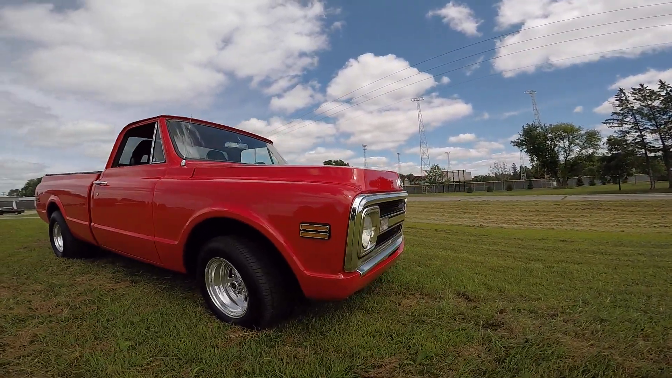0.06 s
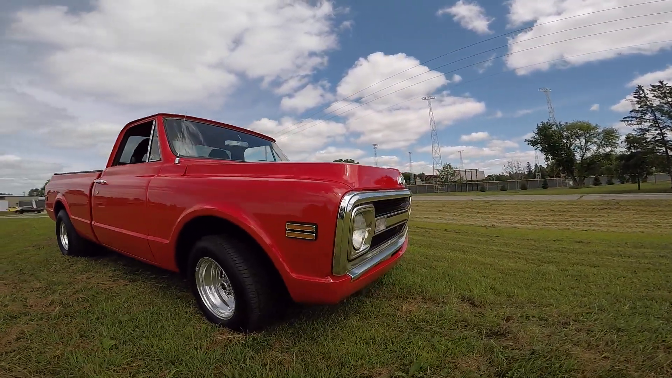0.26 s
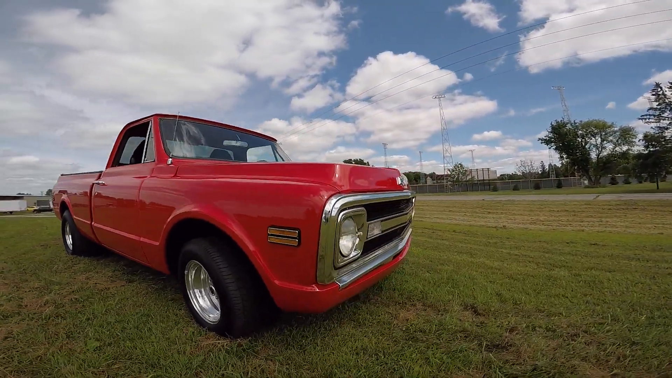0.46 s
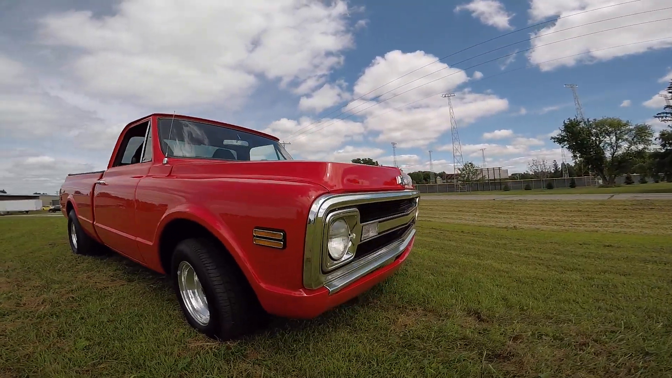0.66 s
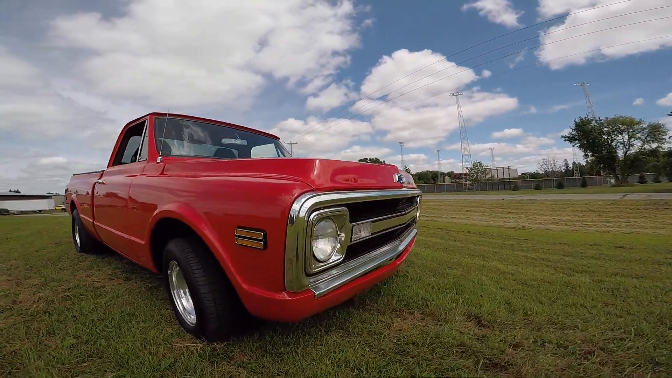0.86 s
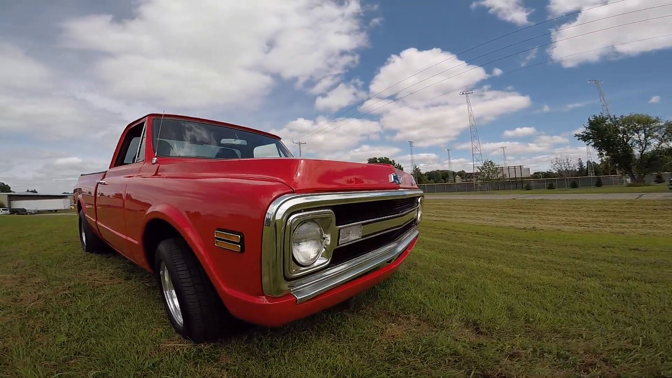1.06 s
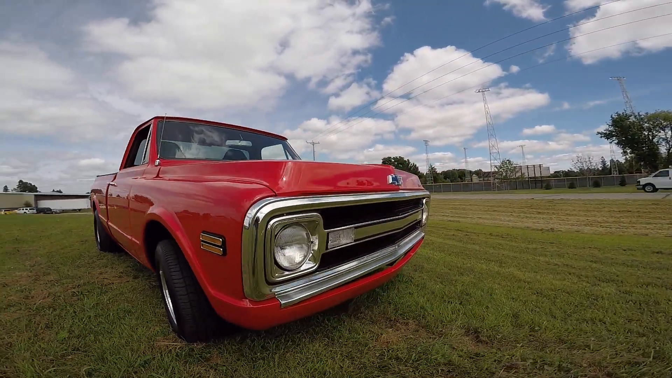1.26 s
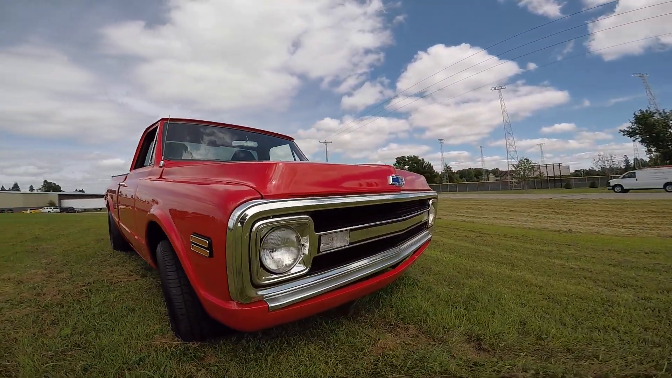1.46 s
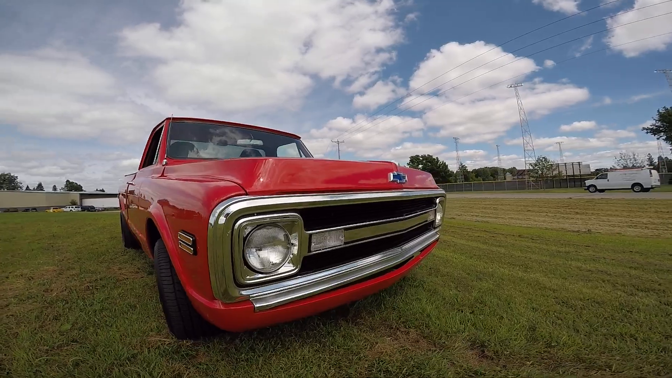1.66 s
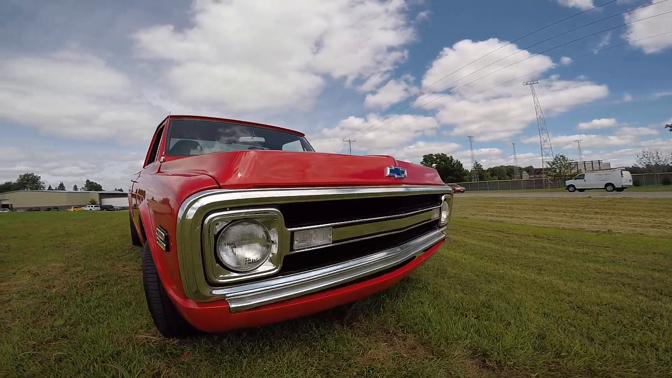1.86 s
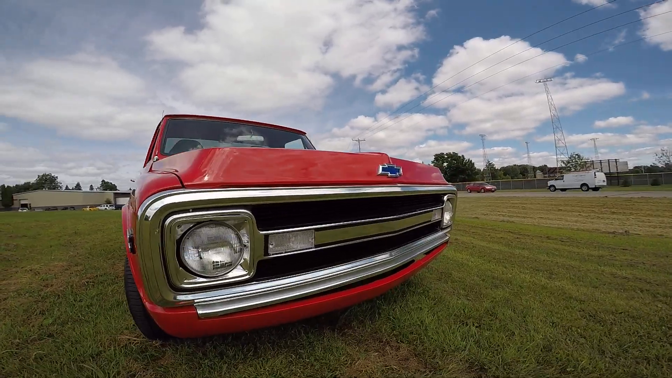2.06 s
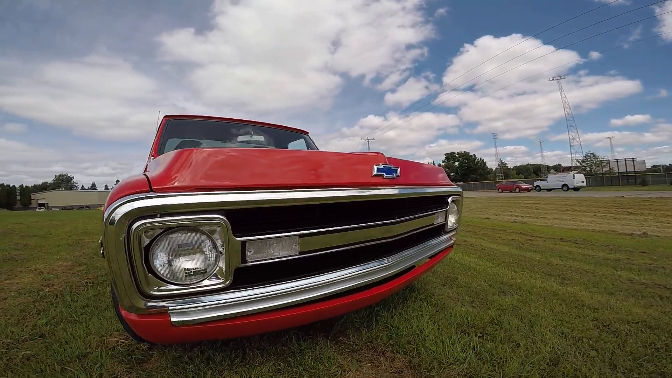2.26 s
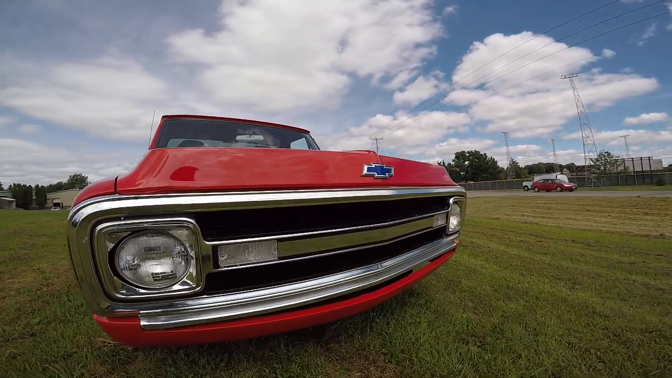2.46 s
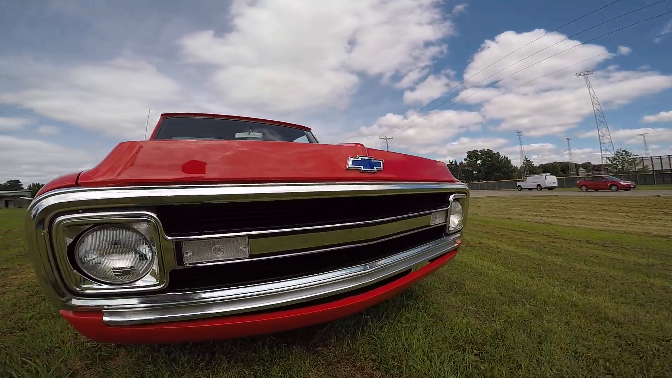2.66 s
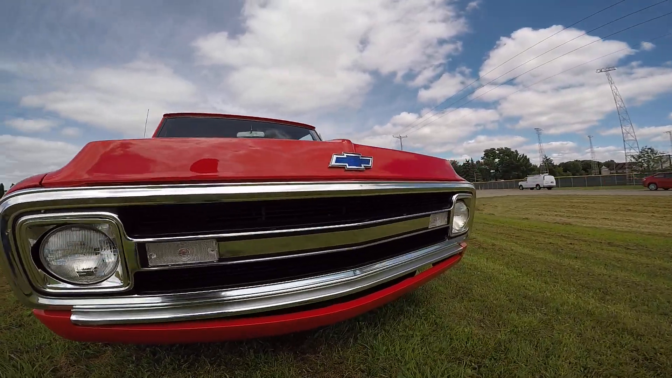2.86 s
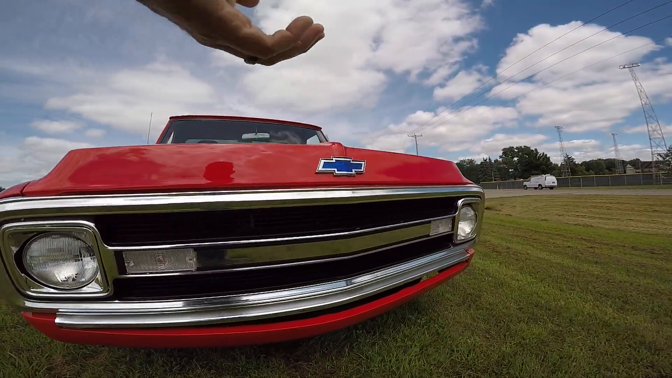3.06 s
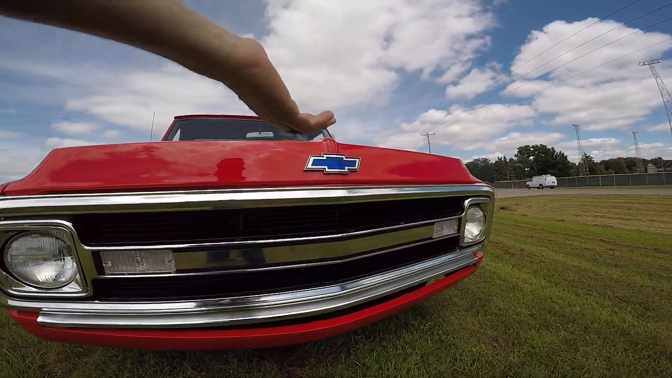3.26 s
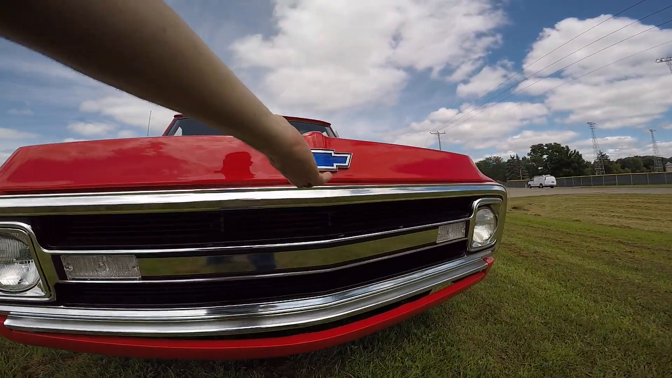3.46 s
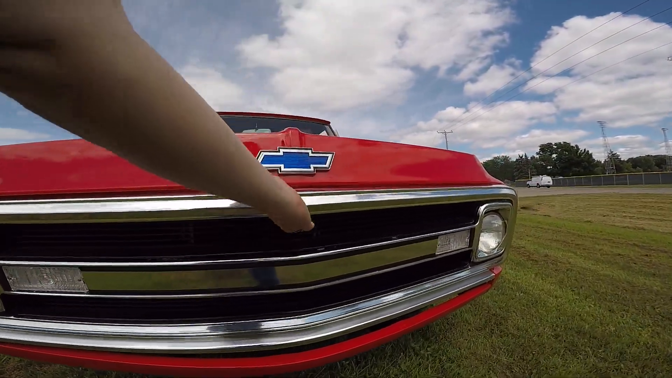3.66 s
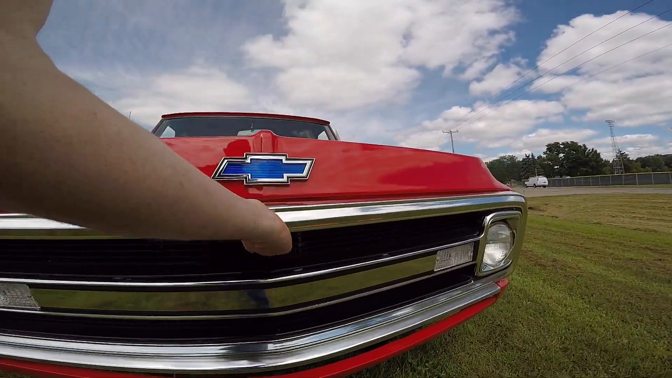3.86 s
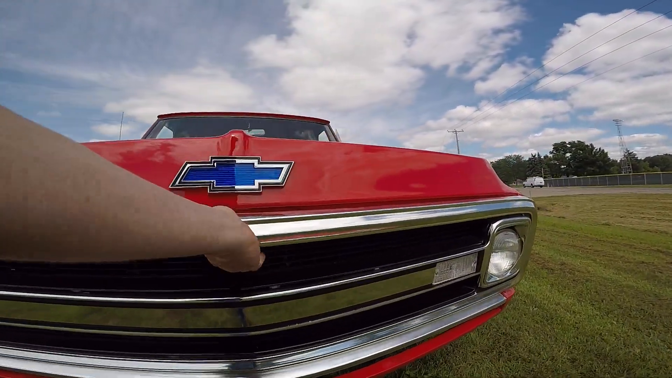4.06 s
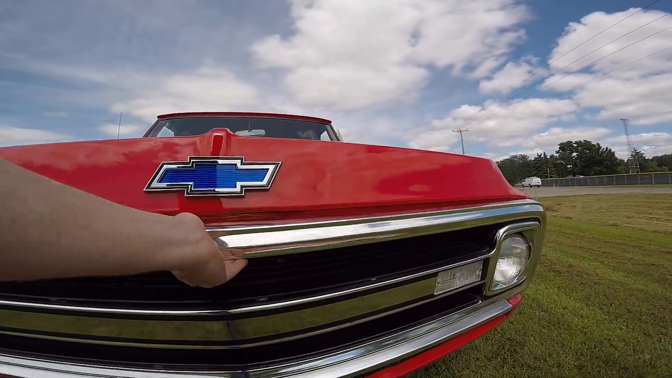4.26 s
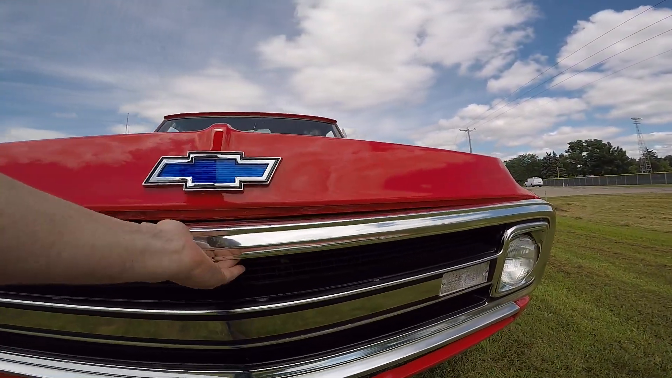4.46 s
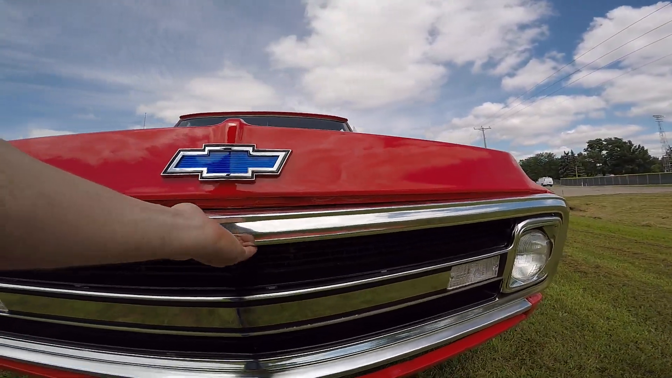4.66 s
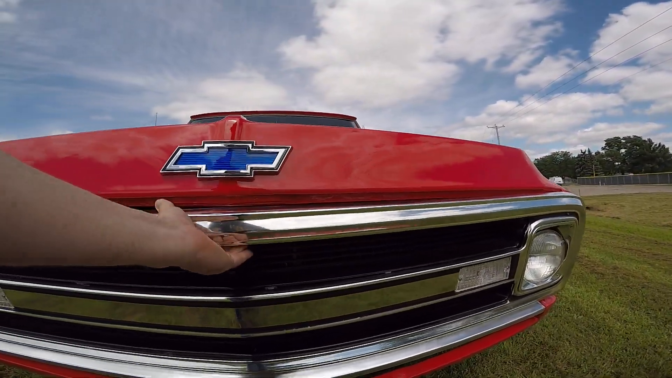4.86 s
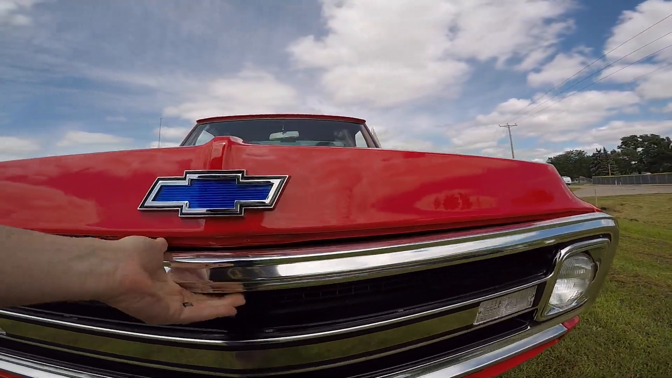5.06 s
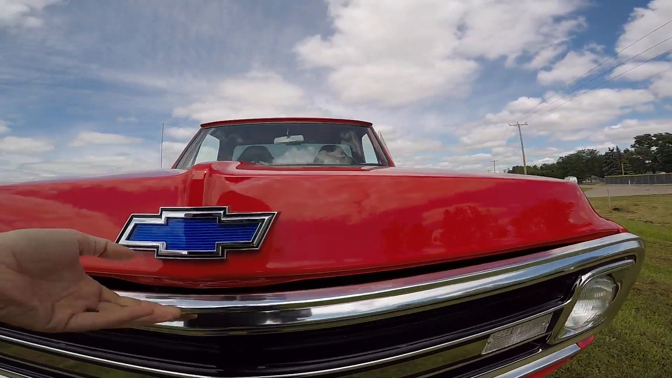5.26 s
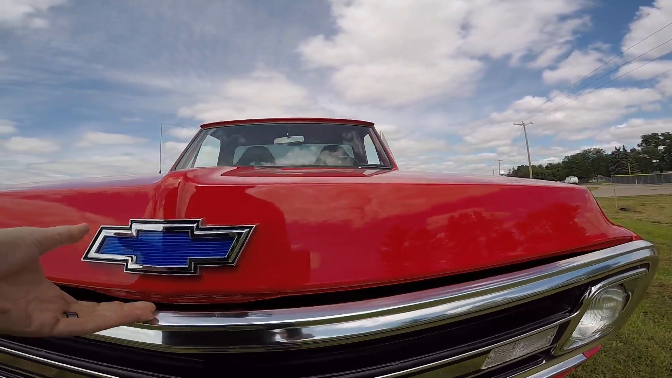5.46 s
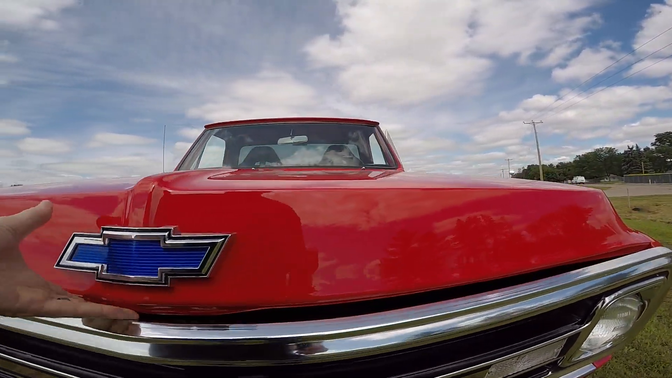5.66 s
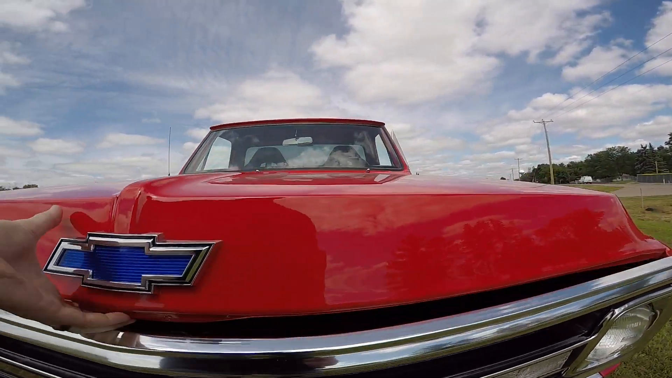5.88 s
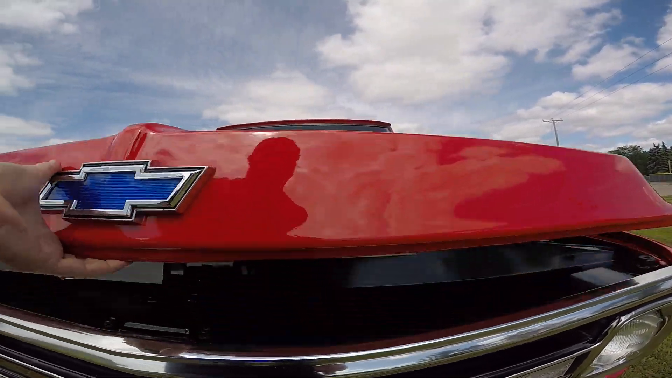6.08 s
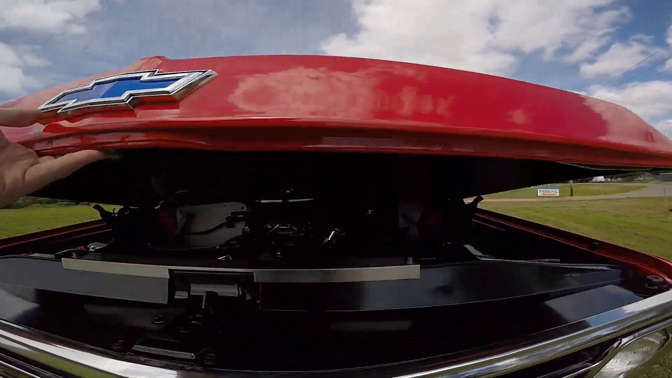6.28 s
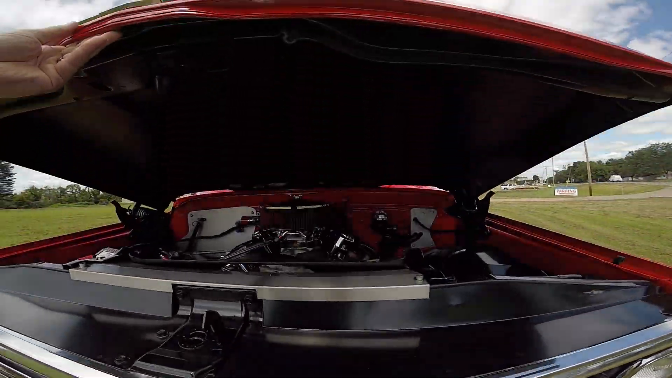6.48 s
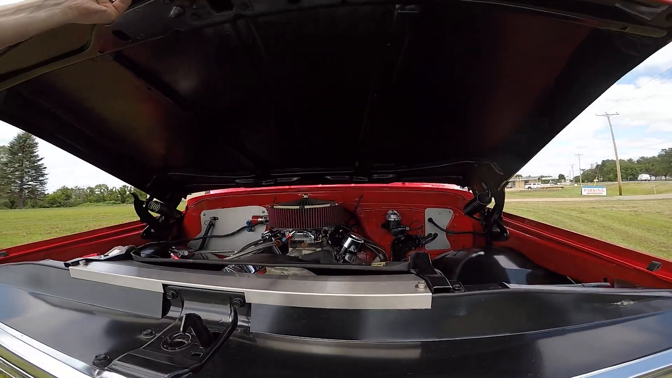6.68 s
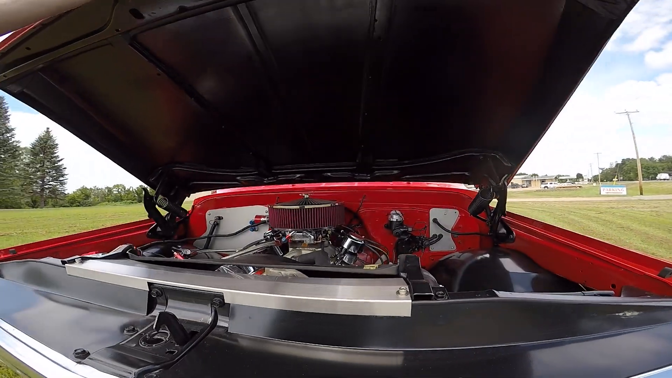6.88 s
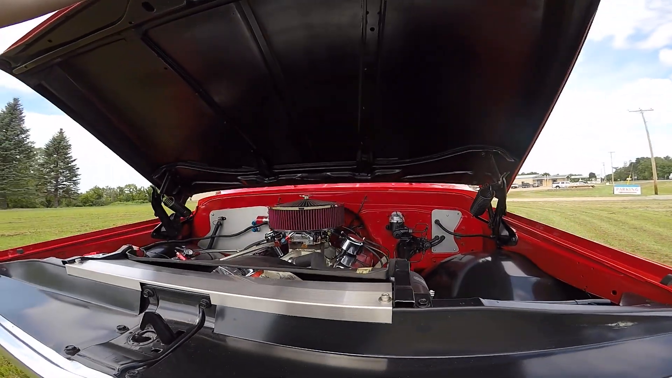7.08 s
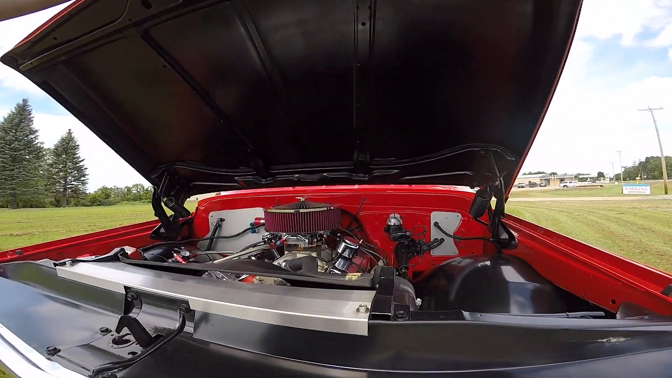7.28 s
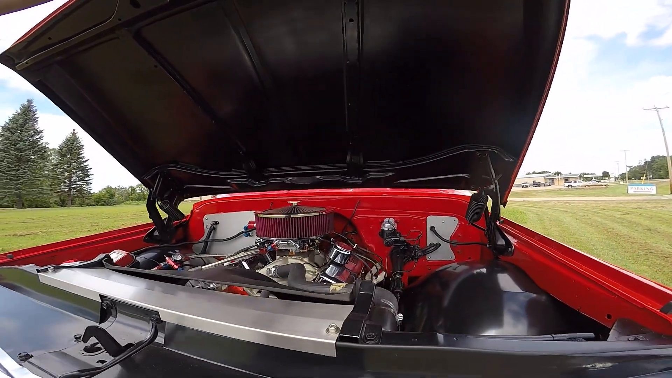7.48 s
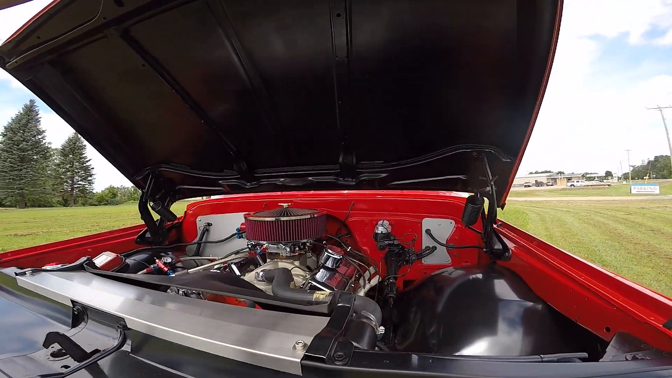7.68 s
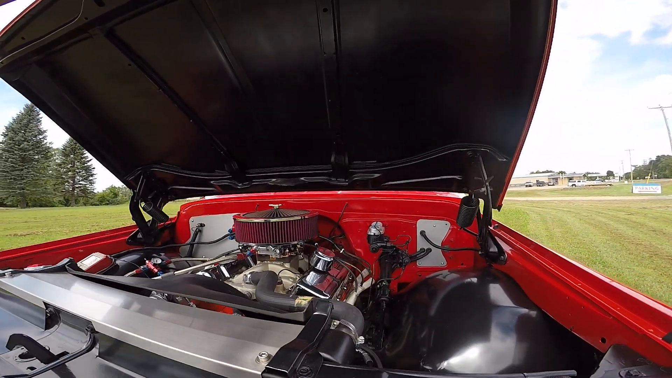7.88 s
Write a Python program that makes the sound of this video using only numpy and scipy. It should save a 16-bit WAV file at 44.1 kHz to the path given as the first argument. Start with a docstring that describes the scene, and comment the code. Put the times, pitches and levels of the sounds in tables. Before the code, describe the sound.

Wind rumbles on the microphone outdoors as a truck's hood latch clacks several times and the steel hood is lifted with clunks.

```python
"""Opening a truck's hood in a breezy field

Wind rumbles on a small camera microphone and whistles past an edge; tyres roar on a far road.
Grass hisses, feet brush through it, and the hand-held camera bumps. Fingers tick on the hood latch,
the catch squeals and clacks free, a spring rings, and the steel hood clunks as it is lifted and
reaches its stop. Near the end an insect trills and there is a faint hum."""
import sys
import numpy as np
from scipy import signal
from scipy.fft import rfft, irfft, next_fast_len
from scipy.io import wavfile

SR = 44100
rng = np.random.default_rng(int(sys.argv[2]) if len(sys.argv) > 2 else 0)


def waveform_to_disk(signal):
    """Save audio, clipped to [-1, 1], as 16-bit WAV at the path in sys.argv[1]."""
    frames = np.transpose(np.atleast_2d(signal))
    scaled = np.clip(frames, -1, 1) * 32767
    samples = np.round(scaled).astype(np.int16)
    wavfile.write(sys.argv[1], SR, samples)


N = 349713
TIME = np.arange(N) / SR


def from_db(db):
    """Turn decibels into a gain."""
    return 10 ** (np.asarray(db) / 20)


def rms_one(x):
    """Scale a sound so that its average strength (rms) is 1."""
    return x / np.sqrt(np.mean(x ** 2) + 1e-20)


def in_time(rows):
    """Join timed rows with straight lines: one curve for each column after the time."""
    times, *columns = np.transpose(rows)
    return [np.interp(TIME, times, column) for column in columns]


def swells(rows):
    """A gain that rises and falls once for each row."""
    return sum(from_db(db) * np.exp(-8 * ((TIME - s) / length) ** 2) for s, length, db in rows)


def spells(rows, fade_db_per_s=157):
    """A level in dB that holds through each spell and falls away before and after it."""
    levels = [db - fade_db_per_s * np.abs(TIME - np.clip(TIME, start, end)) for start, end, db in rows]
    return np.max(levels, axis=0)


def drift(rate_hz):
    """A slow random wobble of size about 1, made by smoothing coarse noise."""
    r = np.exp(-80 * np.pi * rate_hz / SR)
    slow = signal.lfilter([1], [1, -2 * r, r * r], rng.standard_normal(N // 40 + 2002))[2000:]
    return np.interp(np.arange(N) / 40, np.arange(len(slow)), rms_one(slow))


def coloured(spectrum, flicker_db=0, rate_hz=1):
    """Noise with the given spectrum and rms 1; each half-octave band can flicker on its own."""
    size = next_fast_len(N)
    octave = np.log2(np.maximum(np.arange(size // 2 + 1) * SR / size, 1))
    hz, db = np.transpose(spectrum)
    shape = from_db(np.interp(octave, np.log2(hz), db, left=-120, right=-120))
    shaped = rfft(rng.standard_normal(size)) * shape
    if flicker_db == 0:
        return rms_one(irfft(shaped, size)[:N])
    out = 0
    for centre in np.arange(np.log2(hz[0]), np.log2(hz[-1]) + .25, .5):
        window = np.cos(np.pi * np.clip(octave - centre, -.5, .5)) ** 2
        out += from_db(flicker_db * drift(rate_hz)) * irfft(shaped * window, size)[:N]
    return rms_one(out)


def narrow(hz, db, width_hz, steadiness=0):
    """A narrow band of noise whose pitch and level can move; steadiness 1 makes it a wavering tone."""
    slow = signal.sosfilt(signal.butter(2, width_hz / 2, fs=SR, output="sos"), rng.standard_normal((2, N)))
    slow /= (np.hypot(*slow) + 1e-9) ** steadiness
    phase = 2 * np.pi * np.cumsum(hz) / SR
    return from_db(db) * rms_one(slow[0] * np.cos(phase) + slow[1] * np.sin(phase))


def ring(x, hz, t60):
    """Set one mode (a natural note of an object) ringing; t60 is the time it takes to fall 60 dB."""
    r, w = from_db(-60 / (t60 * SR)), 2 * np.pi * hz / SR
    return signal.lfilter([0, np.sin(w)], [1, -2 * r * np.cos(w), r * r], x + 1e-18)


def band(x, low_hz, high_hz):
    """Keep the part of a sound between two frequencies."""
    return signal.sosfilt(signal.butter(3, [low_hz, high_hz], "band", fs=SR, output="sos"), x)


def burst(t60, rise_s):
    """A rattle of noise that rises quickly and dies away."""
    t = np.arange(SR // 2) / SR
    return rng.standard_normal(len(t)) * (1 - np.exp(-t / rise_s)) * from_db(-60 * t / t60)


def add(out, s, sound):
    """Mix a sound in, starting at s seconds."""
    i = round(s * SR)
    out[i:i + len(sound)] += sound[:N - i]


def wind():
    """Swirling air on the microphone's opening: a lumpy rumble, rougher buffeting and short puffs."""
    # strength of the rumble: t/s, level/dB
    gusts = [(0.0, -27.5), (1.25, -30.5), (1.5, -26), (1.7, -33), (1.82, -24), (2.05, -30), (2.21, -19.5),
             (2.4, -32), (3.2, -31.5), (3.46, -24), (4.09, -32), (4.39, -18.5), (4.68, -30), (5.06, -26),
             (5.3, -33), (5.85, -34.5), (6.05, -24), (6.24, -31), (6.32, -19), (6.4, -35), (6.72, -24),
             (6.83, -28.5), (7.19, -17.5), (7.27, -28.5), (7.37, -29.5), (7.58, -18), (7.81, -16),
             (7.93, -30)]
    # puffs straight into the opening: middle t/s, length/s, level/dB
    puffs = [(2.2, 0.23, -27), (7.08, 0.042, -26.5), (7.2, .08, -22), (7.32, 0.039, -30.5),
             (7.44, 0.058, -31)]
    # spectra of the three parts: f/Hz, relative level/dB
    rumble_spectrum = [(15, -11.5), (28, -1), (50, -5.5), (75, -5), (110, -11.5), (160, -30)]
    buffet_spectrum = [(70, -8), (120, 1), (200, -1.5), (280, -9), (400, -16.5), (500, -27), (650, -36)]
    puff_spectrum = [(40, 1), (100, 2.5), (200, -6), (420, -24.5), (520, -47)]
    wind_db, = in_time(gusts)
    breeze_db, hood_up_s = -21, 6.93
    buffet_db = -35 - .5 * TIME   # eases near the shelter of the truck
    buffet_db += 3 * np.maximum(wind_db - breeze_db, 0)   # leaps in strong gusts
    buffet_db -= 3 * np.clip((TIME - hood_up_s) * 20, 0, 1)   # drops once the hood is up
    rumble = from_db(wind_db) * coloured(rumble_spectrum, flicker_db=3.6, rate_hz=10.3)
    buffeting = from_db(buffet_db) * coloured(buffet_spectrum, flicker_db=3.4, rate_hz=30.5)
    return rumble + buffeting + swells(puffs) * coloured(puff_spectrum)


def road_and_grass():
    """Far tyres roar over a lower, steadily fading wash of traffic; grass and leaves hiss."""
    # strength of the far sounds: t/s, tyre level/dB, grass level/dB
    levels = [(0.0, -52, -54.5), (0.75, -48, -56), (2.3, -45.5, -51.5), (2.65, -45, -52), (3.1, -45, -50.5),
              (3.75, -45.5, -54.5), (4.73, -44.5, -58.5), (5.39, -50, -58.5), (6.65, -53.5, -64),
              (7.93, -55.5, -64)]
    # spectra of the three parts: f/Hz, relative level/dB
    tyre_spectrum = [(900, -6.5), (1200, 4), (1500, 1), (1900, -2.5), (2300, -9.5), (3000, -12),
                     (3500, -45), (4200, -37)]
    wash_spectrum = [(300, -18), (500, -14.5), (800, 3.5), (1000, 1), (1300, -3.5)]
    grass_spectrum = [(2400, 1), (3500, 6.5), (4600, 2.5), (5600, 6.5), (6700, 2), (7400, -7.5),
                      (9000, -3.5), (11500, -19), (15500, -48)]
    tyre_db, grass_db = in_time(levels)
    wash_db = -48 - TIME   # loses 1 dB a second
    tyres = from_db(tyre_db) * coloured(tyre_spectrum, flicker_db=1, rate_hz=11)
    wash = from_db(wash_db) * coloured(wash_spectrum, flicker_db=.95, rate_hz=12)
    grass = from_db(grass_db) * coloured(grass_spectrum, flicker_db=1, rate_hz=5.9)
    return tyres + wash + grass


def whistle():
    """Wind whistles faintly past an edge."""
    # the wandering pitch: t/s, f/Hz
    pitch = [(0, 417), (.6, 422.6), (1.1, 403), (1.5, 380.6), (2.8, 382.7), (3.0, 407), (3.25, 373),
             (3.8, 410), (4.3, 381), (5.15, 404.4), (5.9, 396), (6.2, 421.4), (6.5, 386), (6.9, 373)]
    # when it sounds: start t/s, end t/s, level/dB
    blowing = [(-.2, .65, -50.5), (1.05, 1.55, -47), (2.9, 6.9, -46.5)]
    return narrow(*in_time(pitch), spells(blowing), width_hz=14.5, steadiness=.44)


def microphone_hiss():
    """The microphone's own steady noise."""
    # f/Hz, relative level/dB
    spectrum = [(300, 6.5), (1500, -10.5), (3000, -30.5), (8000, -11), (11000, -18), (15500, -28.5)]
    return from_db(-57.5) * coloured(spectrum)


def steps():
    """Feet brush through grass in crackly swishes that swell and fade."""
    # swishes: middle t/s, length/s, level/dB
    swishes = [(0.044, 0.71, -56.5), (0.853, 0.35, -58), (1.31, .04, -55), (1.658, 0.21, -58),
               (2.145, .03, -55), (2.542, 0.3, -56), (3.272, 0.11, -56), (4.246, 0.24, -57)]
    # their spectrum: f/Hz, relative level/dB
    spectrum = [(2500, -18), (6000, 15.5), (9000, 5), (12000, -1), (15500, -5)]
    crackle = from_db(3.5 * drift(rate_hz=60))
    return swells(swishes) * crackle * coloured(spectrum, flicker_db=1.2, rate_hz=30)


def ticks():
    """Fingers, catch and hinges make light ticks that die fast."""
    # light touches: t/s, level/dB, f/Hz
    touches = [(0.585, -42, 5730), (3.71, -42, 5370), (5.1454, -35, 5800), (5.329, -37.5, 5150),
               (5.481, -38.5, 5600), (5.7036, -41, 6140), (6.547, -47, 3717), (6.795, -47, 3520)]
    out = np.zeros(N)
    for s, db, hz in touches:
        add(out, s, from_db(db) * band(burst(t60=.11, rise_s=.0006), hz / 1.63, hz * 1.33))
    return out


def camera_bumps():
    """The body of the hand-held camera knocks: a dull thump with a hollow top."""
    # bumps: t/s, level/dB, rattle t60/s
    bumps = [(.98, -37, 0.043), (1.264, -27.5, 0.049), (1.447, -31, 0.083)]
    out = np.zeros(N)
    for s, db, t60 in bumps:
        rattle = burst(t60, rise_s=.0015)
        hit = rattle / 2 + 10 * signal.unit_impulse(len(rattle), SR // 400)
        thump = 1.56 * ring(signal.unit_impulse(len(hit)), 239.6, t60 * 2.7) + 4.9 * band(hit, 100, 300)
        hollow = 5.7 * band(hit, 630, 1000) + 3 * band(hit, 1250, 1410)
        add(out, s, from_db(db) * (thump + hollow))
    return out


def passing_car():
    """A far car goes by: a band of noise that sinks in pitch, and a brief lower one."""
    # paths of the two bands: t/s, f/Hz, level/dB
    main_band = [(1.2, 2000, -63), (2.0, 1912, -54), (2.45, 1861, -50.5), (2.9, 1591, -46.5),
                 (3.4, 1335, -44.5), (4.0, 1440, -48), (4.6, 1478, -47), (5.2, 1413, -91)]
    low_band = [(1.9, 1311, -82), (2.3, 1250, -43.5), (2.7, 1317, -51), (3.0, 1296, -70)]
    return narrow(*in_time(main_band), width_hz=284) + narrow(*in_time(low_band), width_hz=250)


def latch_ring(rattle, centre_hz, focus_db):
    """A hard hit and its rattle ring the latch; modes an octave from centre_hz lose focus_db."""
    # modes of the latch and its bracket: f/Hz, level/dB
    modes = [(1410, -26), (1640, -30), (1950, -37), (2280, -31), (3020, -35), (3300, -44), (3470, -33),
             (3850, -34.5), (4200, -30), (4570, -29.5), (5010, -38), (5450, -38), (6100, -39),
             (6700, -32.5), (7100, -33), (7950, -34)]
    struck = rattle + 12 * signal.unit_impulse(len(rattle), SR // 400)
    out = 0
    for k, (hz, db) in enumerate(modes):
        strength = from_db(db - focus_db * np.log2(hz / centre_hz) ** 2 + rng.normal(0, 1.44))
        out += (-1) ** k * strength * ring(struck, hz, t60=.028)
    return out


def hood_thud(thud_hz, ring_share):
    """The steel hood shudders and rings, most strongly in the modes near thud_hz."""
    # modes of the panel: f/Hz, level/dB, t60 when free/s
    modes = [(124.8, 1, 0.43), (172, -4, 0.35), (193, -4, 0.8), (215, 7, 0.21), (244.7, -2, 0.55),
             (277, 2.5, 0.19), (313, -2, 0.79), (371, 0, 0.71), (410, 4, 0.36), (472, -3, 0.25)]
    push = np.pad(np.hanning(SR // 400), (0, SR // 2 - SR // 400)) / (SR // 800)   # soft, 2.5 ms long
    upper_modes = .87 * band(burst(t60=.29, rise_s=.0026), 244, 1160)   # too close to tell apart
    shudder = from_db(17.5) * band(burst(t60=.82 * ring_share, rise_s=.043), 86, 284)
    out = upper_modes + shudder
    for hz, db, t60 in modes:
        strength = from_db(db - 8 * np.log2(hz / thud_hz) ** 2 + rng.normal(0, 2))
        late_push = np.roll(push, int(rng.uniform(.001, .005) * SR))   # the bend spreads over the sheet
        out -= strength * ring(late_push, hz, t60 * ring_share)
    return out


def latch_and_hood():
    """Each blow of metal on metal gives a bright clack, a duller knock, a brief shimmer and a thud."""
    # blows: t/s, clack level/dB, clack f/Hz, clack t60/s, knock level/dB, knock f/Hz,
    # shimmer level/dB, thud level/dB, thud f/Hz
    blows = [(3.9087, -30.5, 3440, 0.1, -30, 1293, -40, -23.5, 209),
             (4.2201, -47, 4760, 0.11, -34, 1563, -51, -27.5, 215),
             (4.338, -29.5, 4520, 0.12, -21.5, 2230, -56, -16.5, 214),
             (4.494, -27, 5500, 0.073, -56, 1680, -31.5, -47, 121),
             (4.6127, -17, 4300, 0.11, -16, 1650, -33, -25, 116.6),
             (4.6667, -26.5, 6270, .04, -34, 1670, -40, -41, 137),
             (4.8001, -19, 4640, 0.1, -12.5, 2460, -43, -26, 152),
             (4.9734, -17.5, 4400, 0.082, -16.5, 2330, -22, -18.5, 215),
             (5.002, -42, 4400, 0.055, -38, 2330, -60, -21, 121),
             (5.8464, -27, 6650, 0.12, -23, 1540, -34, -30, 217),
             (5.9426, -21, 5260, 0.19, -20, 1830, -27, -16, 210),
             (5.9841, -8, 3970, 0.095, -9, 2050, -37, -40, 256),
             (7.561, -24.5, 5330, 0.15, -23, 1650, -42, -22.5, 223),
             (7.6141, -19.5, 5250, 0.097, -24, 1970, -45, -20.5, 184)]
    freed_s = 5.5
    out = np.zeros(N)
    for s, clack_db, clack_hz, t60, knock_db, knock_hz, shimmer_db, thud_db, thud_hz in blows:
        rattle = burst(t60, rise_s=.0019)
        clack = latch_ring(rattle, clack_hz, focus_db=61) + .93 * band(rattle, 2700, 7040)
        rap = burst(t60 * 1.83, rise_s=.0011)
        knock = latch_ring(rap, knock_hz, focus_db=119) + .9 * band(rap, 780, 2800)
        knock += from_db(-69.5) * ring(rap, hz=1800, t60=.47)   # one faint mode lingers
        shimmer = band(burst(t60=.036, rise_s=.002), 7200, 12800)
        thud = hood_thud(thud_hz, ring_share=.45 if s < freed_s else 1)   # a latched hood rings less
        for db, part in (clack_db, clack), (knock_db, knock), (shimmer_db, shimmer), (thud_db, thud):
            add(out, s, from_db(db) * part)
    return out


def squeals():
    """Metal squeals as it slips free, swelling up to the blow that stops it."""
    # slips: end t/s, length/s, f/Hz, level/dB
    slips = [(4.339, 0.012, 6300, -42), (4.621, 0.021, 6330, -39), (4.978, 0.027, 6500, -43),
             (5.859, 0.032, 6260, -39), (5.988, 0.017, 4030, -32), (7.577, 0.039, 5940, -40.5)]
    out = np.zeros(N)
    for end, length, hz, db in slips:
        swell = np.linspace(0, 1, round(length * SR))
        grit = rng.standard_normal(SR // 8)
        squeal = rms_one(band(grit, hz / 1.035, hz * 1.035)) + .6 * rms_one(band(grit, 3000, 8500))
        add(out, end - length, from_db(db) * swell * squeal[-len(swell):])
    return out


def catch_and_spring():
    """First the catch lever, then the hood spring is plucked and left to ring."""
    # the two plucks: t/s, level/dB
    plucks = [(4.979, -25), (5.98, -37.5)]
    # modes of the lever and of the spring: f/Hz, level/dB, t60/s
    catch_modes = [(4300, -2, .04), (6400, -3, .08), (6620, -3, .08), (6900, -5, .06), (9170, -36, .6),
                   (9290, -36, .5), (11000, -37, .5)]
    spring_modes = [(3068, -6, .55), (3084, -7, .55), (3429, 0, .32), (4204, -7, .72)]
    out, click = np.zeros(N), signal.unit_impulse(SR)
    for (s, pluck_db), modes in zip(plucks, [catch_modes, spring_modes]):
        for hz, db, t60 in modes:
            add(out, s, from_db(pluck_db + db) * ring(click, hz, t60))
    return out


def insect():
    """An insect trills: evenly spaced high pips of slightly uneven strength."""
    first_s, last_s, period_s = 5.489, 7.25, .0578
    pip_hz, pip_s = 8050, .014
    out, t = np.zeros(N), np.arange(SR // 20) / SR
    pip = np.sin(np.pi * np.minimum(t / pip_s, 1)) * np.sin(2 * np.pi * pip_hz * t)
    for s in np.arange(first_s, last_s, period_s):
        add(out, s, from_db(-61 + rng.normal(0, .59)) * pip)
    return out


def hum(hz=502, start_s=5.7, end_s=7.0, db=-58.5):
    """A faint hum of steady pitch comes and goes."""
    return narrow(np.full(N, hz), spells([(start_s, end_s, db)]), width_hz=1.7, steadiness=.23)


def scene():
    """All the sounds meet at the microphone, in one channel."""
    handling = latch_and_hood() + catch_and_spring() + ticks() + squeals() + camera_bumps() + steps()
    outdoors = wind() + road_and_grass() + passing_car() + whistle() + hum() + insect()
    return (handling + outdoors + microphone_hiss())[None]


def record(dry):
    """The camera's housing weakens a few narrow bands, and the highest treble is cut steeply."""
    # the housing's dips and one slight, broad lift: f/Hz, width/Hz, gain/dB
    housing = [(564, 23.8, -21.5), (1093, 277, -13), (2716, 450, -6.5), (4760, 5600, 0.5), (7540, 360, -3)]
    cutoff_hz = 15750
    for hz, width_hz, db in housing:
        middle = -2 * np.cos(2 * np.pi * hz / SR)
        width, root_gain = np.pi * width_hz / SR, from_db(db / 2)
        forward = [1 + width * root_gain, middle, 1 - width * root_gain]
        feedback = [1 + width / root_gain, middle, 1 - width / root_gain]
        dry = signal.lfilter(forward, feedback, dry)
    return signal.sosfilt(signal.cheby2(20, 70, cutoff_hz, fs=SR, output="sos"), dry)


dry = scene()
out = record(dry)
waveform_to_disk(out)
```